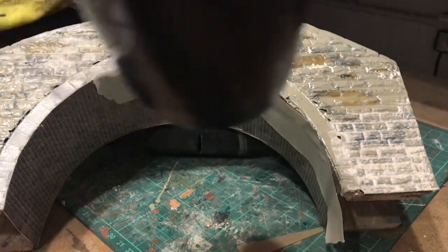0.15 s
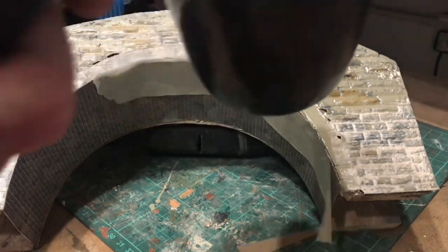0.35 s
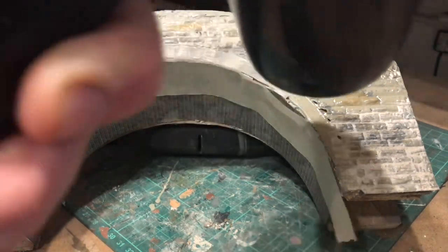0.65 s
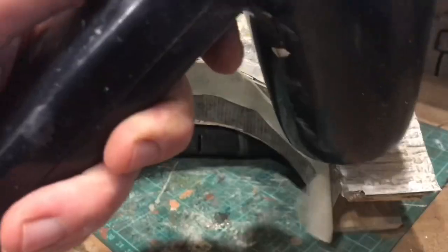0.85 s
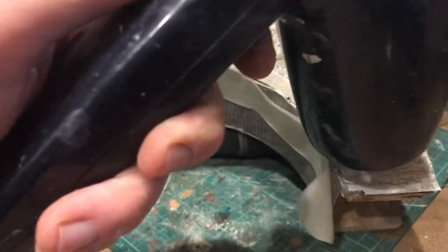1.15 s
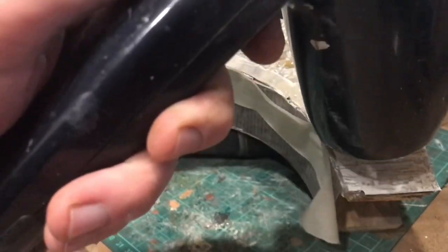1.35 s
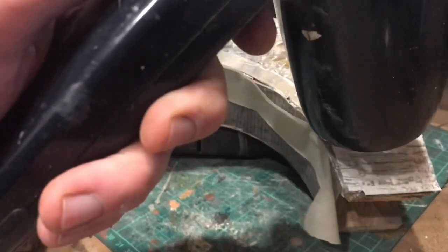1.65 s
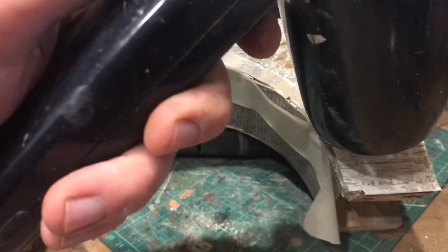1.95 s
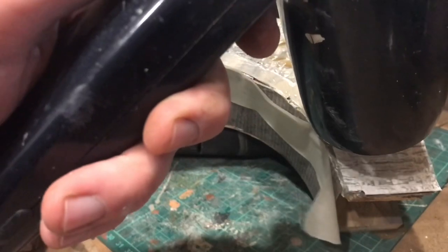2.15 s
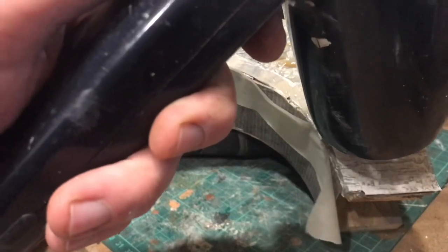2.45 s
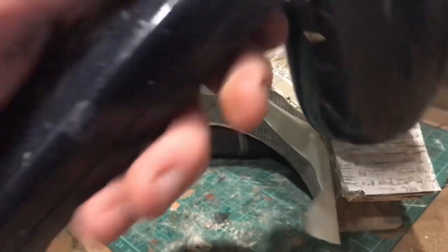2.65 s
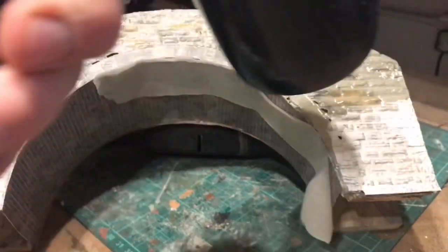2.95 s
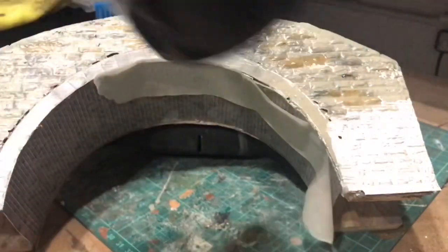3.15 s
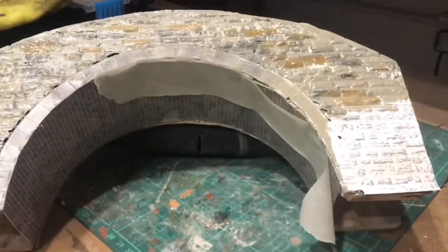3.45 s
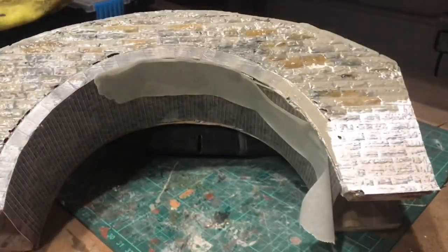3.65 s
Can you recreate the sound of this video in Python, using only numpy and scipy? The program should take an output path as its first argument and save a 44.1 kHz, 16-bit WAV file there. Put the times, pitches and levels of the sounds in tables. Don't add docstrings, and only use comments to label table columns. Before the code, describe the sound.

A handheld hairdryer clicks on, roars steadily with a whine, then clicks off and winds down.

```python
import sys
import numpy as np
from scipy import signal
from scipy.fft import rfft, irfft
from scipy.io import wavfile
from scipy.ndimage import uniform_filter1d

SR = 44100
rng = np.random.default_rng(int(sys.argv[2]) if len(sys.argv) > 2 else 0)


def file_out(sig):
    cols = np.atleast_2d(sig).T
    lim = np.clip(cols, -1, 1)
    pcm = np.round(lim * 32767).astype(np.int16)
    wavfile.write(sys.argv[1], SR, pcm)


def convert_level_to_amplitude(level_db):
    exponent = np.asarray(level_db, float) / 20
    return 10 ** exponent


N = 167580
T = np.arange(N) / SR

# freq_hz, density_db_per_hz
ROOM_FLOOR = [(18, -46.5), (35, -23), (70, -11), (110, -18.5), (200, -23), (361, -27.5), (793, -34),
              (12700, -49)]
# freq_hz, level_db
HUM = [(60.5, -64), (72, -62.5), (145.3, -67), (215, -84)]
# time_s, level_db
WHISTLE = [
    (0.01, -82.5),
    (.15, -78),
    (3.1, -56),
    (3.3, -69.),
    (3.42, -73),
    (3.47, -95),
]
# start_s, body_db, tick_db
SNAPS = [
    (.1155, -58, -80),
    (.1247, -26.5, -37),
    (.1263, -44, -33),
    (.1295, -50, -43),
    (.1335, -50, -48),
    (.138, -50, -52),
]
# start_s, body_db, tick_db
RELEASES = [
    (2.9443, -36, -33),
    (2.9848, -32, -34),
    (2.9875, -38, -43),
    (3.197, -60, -74),
]
# freq_hz, level_db, t60_s
SHELL = [(1840, -.5, .035), (2330, -2, .018), (1100, -14, .02), (1450, -13, .03), (2700, -9, .014),
         (3250, -12, .016), (4000, -11, .018), (4500, -12, .018), (5500, -13, .016), (6500, -16, .012),
         (8400, -15, .005)]
# freq_hz, level_db, t60_s
GRIP = [(2020, 11, 0.01), (2890, 8, 0.0097), (3660, 3, .008), (4330, 4, 0.0063), (5500, 0, 0.0063),
        (7400, -3, 0.0052), (9600, -2, 0.0057), (14500, -14, .004)]
# freq_hz, level_db, t60_s
SPRING = [(9400, 0, .005), (10400, -2, .004), (11400, -5, .003), (12600, -10, .004), (14000, -11, .004),
          (600, -3, .008)]
# start_s, housing_db, grille_db
KNOCKS = [(.159, -46, -72), (.1708, -41, -64), (.1795, -32, -63), (.1907, -32, -55), (.197, -36, -64),
          (.209, -37, -72), (.2177, -38, -61), (.243, -33, -70), (.249, -27, -70), (.2795, -36, -52),
          (.2875, -23, -52), (.2935, -36, -52), (.33, -36, -50)]
# freq_hz, level_db, t60_s
HOUSING = [(980, -3, .018), (1400, .5, .014), (3500, -13, .012), (4500, -18, .008), (6000, -24, .006)]
# freq_hz, level_db, t60_s
GRILLE = [(9300, 0, .012), (9800, -3, .01), (11200, -9, .006)]
# multiple, level_db, waver_db, phase_jitter_rad
WHINE = [(1, -45, 2.5, .6), (5, -33, 1.2, .35), (8, -51, 2.5, .8), (10, -50.5, 2, .6), (15, -51.5, 2.5, .8),
         (25, -63, 2.5, .7), (35, -71, 3, 1.)]
# time_s, blade_db, octave_db, third_db
AIM = [(.2, -3., -3., -7), (.27, 3., -3, -7), (.33, 3., -3., -7), (.42, 1., -3., -7), (.52, 4.5, -2., -7),
       (.64, 7.5, -2., -7), (.67, .1, -1., .1), (.85, .1, -1., -1), (.95, .1, 5., .1), (1.72, .1, 5., -1),
       (1.82, .1, -2., .1), (2.64, .1, -2, -1), (2.68, .8, -2, -9), (2.92, .5, -2., -9),
       (2.97, 3., -3., -9), (3.03, 3., -4., -9), (3.055, -7., -4., -9), (3.12, -14., -6., -9)]
# time_s, gain_db
NEAR = [(.1, -2), (.16, 7), (.186, -9), (.2, -3), (.235, -3), (.26, -1.5), (.4, 0.2), (.6, 0.24),
        (.8, 0.03), (2.6, 0.2), (2.72, -0.6), (2.95, -.5), (3.02, -2.5), (3.1, -4), (3.195, -4),
        (3.205, -8), (3.28, -7), (3.32, -21), (3.36, -30.5), (3.5, -52)]
# freq_hz, density_db_per_hz
AIR = [(18, -62.5), (30, -26), (188, -7), (733, -17.5), (904, -13.5), (1060, -0.5), (1690, -12.5),
       (6440, -34.5), (15700, -54)]
# freq_hz, power
AIR_POWER = [(60, 0.8), (300, 0.95), (1100, 1.54), (3000, 2), (8000, 2.6), (15000, 1.7)]
# freq_hz, width_hz, gain_db
BARREL = [(163, 90, -0.5), (732, 212, 11), (900, 69, -2.5), (1053, 67, 5.5), (1830, 230, -2.5),
          (2300, 350, 4.5), (2620, 270, -3.5), (3380, 380, 4), (5120, 170, -6), (6110, 1800, 4),
          (593, 154, 4.5), (9070, 1040, 6), (10500, 990, -4.5), (11300, 830, 6)]
# freq_hz, width_hz, gain_db
EARLY = [(1000, 49, 7), (1068, 80, -4.5), (1160, 120, 1.5), (1900, 170, 7), (300, 200, -3)]
# freq_hz, width_hz, gain_db
LATE = [(1030, 80, 5), (2290, 250, 4), (2734, 300, -3.5), (700, 410, -0.5)]
# freq_hz, width_hz, gain_db
AWAY = [(965, 60, 4), (1048, 80, -4), (1180, 220, 4), (750, 250, -2.5), (2300, 400, 2), (3500, 700, 4),
        (6500, 2500, -2)]

ROOM_DB, WHISTLE_HZ = -69, 950
HUM_EARLY_DB, HUM_BACK_S = -12, 3.38
TICK_T60_S, TICK_LOW_HZ, TICK_TOP_HZ = .012, 2500, 8000
PRESS_S, DAMP_S = .0003, .0065
THUMP_S, THUMP_DB, THUMP_HZ, THUMP_T60_S = .128, -42, 110, .07
PING_S, PING_DB = .1263, -30
SHAFT_HZ, ON_S, SPIN_UP_S, SPIN_UP_SHAPE = 194.0, .13, .142, 1.36
OFF_S, COAST_S, COAST_SHAPE = 2.937, .235, 1.15
WHINE_POWER, TOP_EARLY_DB = 2.5, -6
AIR_DB, PATCHY_DB, SWELL_DB = -25.5, 0.72, 1.5
FAR_DULL, FAR_BASS, AWAY_S = .4, .3, 2.96
ROOM_T60_S, WET_DB, SWITCH_SEND_DB = 0.45, -20, -5
CUT_S, CUT_OUT_S, CUT_IN_S, CUT_DB = 0.6573, 0.037, 0.031, -41.5
SPLICE_S, SPLICE_HALF_S, SPLICE_DB = 2.657, .003, -6
MIC_LOW_HZ, EDGE_HZ = 43.8, 15740


def evened(x):
    return x / np.sqrt(np.mean(x ** 2) + 1e-20)


def read(points, hz):
    f, value = np.transpose(points)
    return np.interp(np.log(hz + 1), np.log(f + 1), value)


def drift(rate_hz):
    coarse = rng.standard_normal(400)
    return evened(uniform_filter1d(np.interp(T * rate_hz, np.arange(400), coarse), size=600))


def room_tone():
    hz = np.fft.rfftfreq(N, 1 / SR)
    shape = rfft(rng.standard_normal(N)) * convert_level_to_amplitude(read(ROOM_FLOOR, hz))
    noise = irfft(shape, N) / np.std(irfft(shape * (hz > 250), N))
    hum = np.zeros(N)
    for f, db in HUM:
        hum += convert_level_to_amplitude(db + 1.5 * drift(8)) * np.sqrt(2) * np.sin(2 * np.pi * (f * T + rng.random()))
    hum *= convert_level_to_amplitude(HUM_EARLY_DB * (1 - np.clip((T - HUM_BACK_S) / 0.15, 0, 1)))
    whistle_db = np.interp(T, *np.transpose(WHISTLE)) + 3 * drift(19)
    whistle = convert_level_to_amplitude(whistle_db) * np.sin(2 * np.pi * WHISTLE_HZ * T + 1.2 * drift(43))
    return convert_level_to_amplitude(ROOM_DB) * noise + whistle + hum


def ring(modes, t):
    phase = rng.random(len(modes))
    return sum(convert_level_to_amplitude(db - 60 * t / t60) * np.sin(2 * np.pi * (hz * t + 0.21 * p))
               for (hz, db, t60), p in zip(modes, phase))


def switch():
    t, out = np.arange(2000) / SR, np.zeros(N)

    def strike(start_s, rise_s, blow):
        out[round(start_s * SR):][:2000] += np.minimum(t / rise_s, 1) * blow

    band = signal.butter(1, [TICK_LOW_HZ, TICK_TOP_HZ], "band", fs=SR)
    for s, body_db, tick_db in SNAPS + RELEASES:
        tick = signal.lfilter(*band, rng.standard_normal(2000)) * convert_level_to_amplitude(-60 * t / TICK_T60_S)
        if s < OFF_S:
            body = ring(SHELL, t) * np.minimum(t / PRESS_S, 1) / (1 + (t / DAMP_S) ** 6)
        else:
            body = ring(GRIP, t)
        strike(s, 0.0001, convert_level_to_amplitude(body_db) * body + convert_level_to_amplitude(tick_db) * tick)
    thump = [(THUMP_HZ, 0, THUMP_T60_S), (2.7 * THUMP_HZ, -3, .03)]
    strike(THUMP_S, 0.0016, convert_level_to_amplitude(THUMP_DB) * ring(thump, t))
    strike(PING_S, 0.00017, convert_level_to_amplitude(PING_DB) * ring(SPRING, t))
    for s, db, sparkle_db in KNOCKS:
        strike(s, 0.00044, convert_level_to_amplitude(db) * ring(HOUSING, t) + convert_level_to_amplitude(sparkle_db) * ring(GRILLE, t))
    return out


def speed(t):
    up = 1 - np.exp(-(np.maximum(t - ON_S, 0) / SPIN_UP_S) ** SPIN_UP_SHAPE)
    coast = np.exp(-(np.maximum(t - OFF_S, 0) / COAST_S) ** COAST_SHAPE)
    return np.maximum(up * coast, 1e-4)


def whine():
    s = speed(T)
    at, blade_db, octave_db, third_db = np.transpose(AIM)
    aim_db = {5: np.interp(T, at, blade_db), 10: np.interp(T, at, octave_db), 15: np.interp(T, at, third_db)}
    turn = 2 * np.pi * np.cumsum(SHAFT_HZ * s * (1 + 0.001 * drift(3))) / SR
    out = np.zeros(N)
    for k, db, waver_db, jitter_rad in WHINE:
        turned_db = aim_db.get(k, TOP_EARLY_DB * (T < CUT_S) * (k > 12))
        level = convert_level_to_amplitude(db + turned_db + waver_db * drift(8.84))
        out += level * np.sqrt(2) * np.sin(k * turn + jitter_rad * drift(30))
    return out * s ** WHINE_POWER * convert_level_to_amplitude(np.interp(T, *np.transpose(NEAR)))


def hiss(field_db):
    a, b = rng.standard_normal((field_db.shape[1], 257, 2)).T
    return signal.istft((a + 1j * b) * convert_level_to_amplitude(field_db), nperseg=512, noverlap=384)[1][:N]


def bumps(table, hz):
    return sum(db / (1 + (2 * (hz - f) / w) ** 2) for f, w, db in table)


def air():
    t, hz = np.arange(N // 128 + 5) * 128 / SR, np.fft.rfftfreq(512, 1 / SR)
    patches = rng.standard_normal((len(t), 257)).T
    patches = uniform_filter1d(patches, size=8, axis=0)
    patches = evened(uniform_filter1d(patches, size=20, axis=1))
    near_db = np.interp(t, *np.transpose(NEAR))
    dull = 1 + FAR_DULL * np.log2(np.maximum(hz, 1000) / 1000)
    dull += FAR_BASS * np.log2(np.clip(hz, 150, 1000) / 1000)
    speed_db = read(AIR_POWER, hz)[:, None] * 20 * np.log10(speed(t))
    flow = hiss(speed_db + dull[:, None] * near_db + PATCHY_DB * patches) * convert_level_to_amplitude(SWELL_DB * drift(6.1))
    fine_hz = np.fft.rfftfreq(N, 1 / SR)
    colour_db = read(AIR, fine_hz) + bumps(BARREL, fine_hz)
    spectrum = rfft(flow)

    def coloured(turn_db):
        return irfft(spectrum * convert_level_to_amplitude(colour_db + turn_db), N)

    rush = coloured(0)
    early, late, away = (coloured(bumps(table, fine_hz)) for table in (EARLY, LATE, AWAY))
    out = np.select([T < CUT_S, T > AWAY_S, T > SPLICE_S], [early, away, late], rush)
    return convert_level_to_amplitude(AIR_DB) * out / np.std(rush[SR:2 * SR])


def room(x):
    t = np.arange(SR // 2) / SR
    tail = rng.standard_normal(len(t)) * convert_level_to_amplitude(-60 * t / ROOM_T60_S) * (t > .004)
    tail = signal.lfilter([.3], [1, -.7], tail)
    return signal.fftconvolve(x, tail / np.linalg.norm(tail))[:N]


def scene():
    fan, clicks = air() + whine(), switch()
    tail = room(fan + convert_level_to_amplitude(SWITCH_SEND_DB) * clicks)
    return (fan + clicks + convert_level_to_amplitude(WET_DB) * tail + room_tone())[None]


def top_cut(x):
    return signal.sosfilt(signal.butter(12, 16180, fs=SR, output="sos"), x)


def record(dry):
    mic = signal.lfilter(*signal.butter(2, MIC_LOW_HZ, "high", fs=SR), dry)
    ramp = np.clip(np.maximum((CUT_S - T) / CUT_OUT_S, (T - CUT_S) / CUT_IN_S), 0, 1)
    mix = mic * np.maximum(ramp, convert_level_to_amplitude(CUT_DB))
    mix = mix * convert_level_to_amplitude(SPLICE_DB * np.clip(1 - abs(T - SPLICE_S) / SPLICE_HALF_S, 0, 1))
    lowpass = signal.firwin(1023, EDGE_HZ, window=("kaiser", 9), fs=SR)
    mix = signal.oaconvolve(mix, lowpass[None], "same")
    return top_cut(mix)


dry = scene()
out = record(dry)
file_out(out)
```